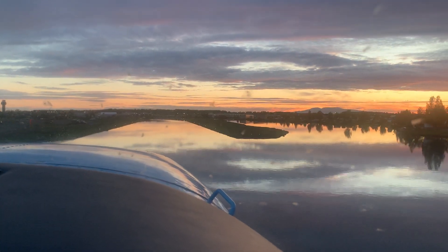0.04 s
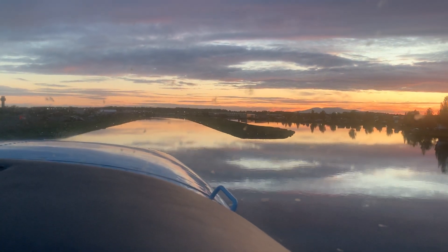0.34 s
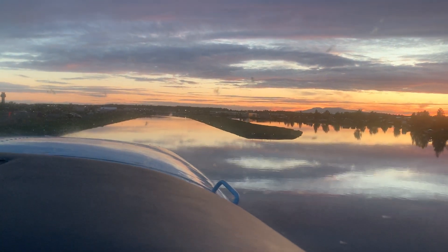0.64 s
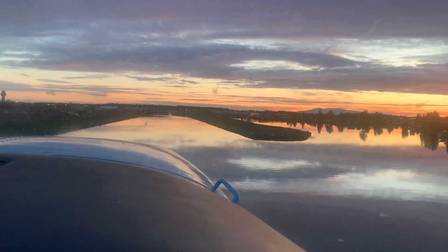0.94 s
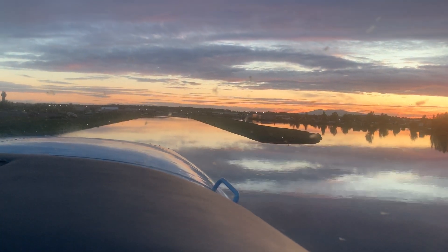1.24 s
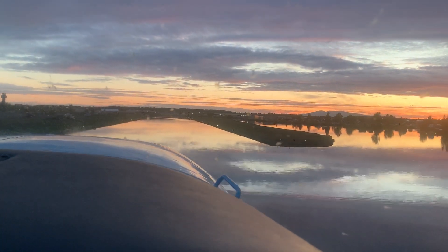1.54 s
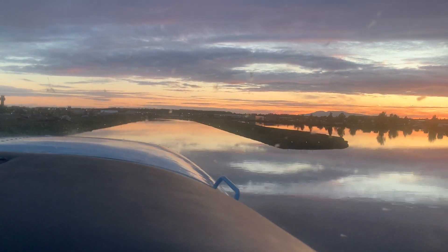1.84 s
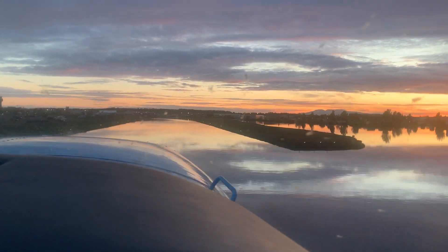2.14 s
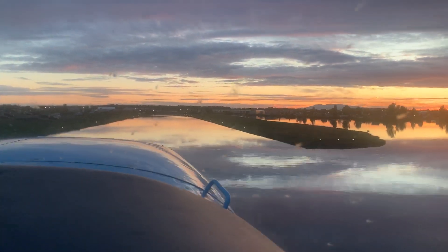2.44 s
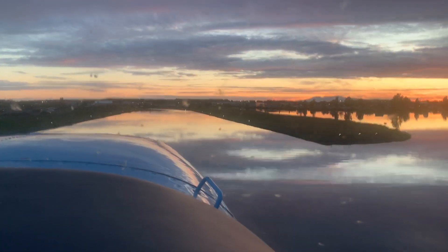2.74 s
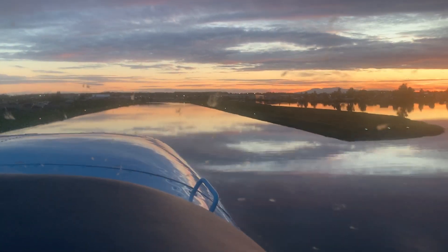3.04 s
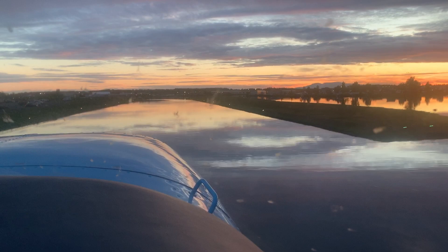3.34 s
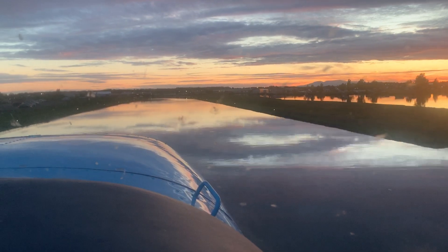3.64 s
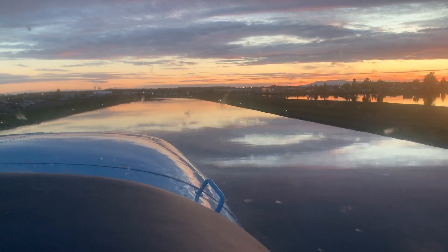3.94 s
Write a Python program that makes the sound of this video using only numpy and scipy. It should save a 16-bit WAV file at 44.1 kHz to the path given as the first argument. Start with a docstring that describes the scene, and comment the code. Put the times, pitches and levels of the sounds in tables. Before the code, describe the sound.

Low drone of a light propeller aircraft from the cockpit, with swelling air rush and hiss.

```python
"""Float plane cabin in low flight

Periodic firing of a six-cylinder engine gives a drone and its octave; unequal cylinders add a comb
of weaker lines and force the panels into resonance. Propeller wash buffets the cabin, turbulent air
rings and hisses at the windscreen, and the whole swells as the plane gathers speed."""
import sys
import numpy as np
from scipy import signal
from scipy.fft import rfft, irfft
from scipy.io import wavfile
from scipy.ndimage import uniform_filter1d

SR = 44100
rng = np.random.default_rng(int(sys.argv[2]) if len(sys.argv) > 2 else 0)


def wrap_up_sound(samples):
    """Save the sound to the file named by the first command line argument, as 16-bit audio."""
    columns = np.atleast_2d(samples).T
    # keep every value between -1 and 1, then stretch to whole-number steps
    tamed = np.clip(columns, -1, 1)
    steps = np.round(tamed * 32767).astype(np.int16)
    wavfile.write(sys.argv[1], SR, steps)


N = 176400
T = np.arange(N) / SR
HZ = np.maximum(np.arange(N // 2 + 1) * SR / N, 1)
CYLINDERS = 6


def undb(db):
    """Amplitude ratio of a level in decibels."""
    return 10 ** (np.asarray(db) / 20)


def unit(x):
    """Normalisation to unit rms."""
    return x / np.sqrt(np.mean(x ** 2))


def curve(rows):
    """Linear interpolation in time."""
    return np.interp(T, *np.array(rows, float).T)


def across(rows, hz=HZ):
    """Interpolation in log frequency."""
    f, v = np.array(rows, float).T
    return np.interp(np.log(hz), np.log(f), v)


def colour(rows):
    """Spectral envelope, with steep roll-off beyond the ends of the table."""
    below, above = np.minimum(HZ / rows[0][0], 1), np.minimum(rows[-1][0] / HZ, 1)
    return undb(across(rows)) * below ** 2 * above ** 4


def resonances(rows):
    """Frequency response as a sum of Lorentzian peaks."""
    return sum(undb(db) / (1 + ((HZ - hz) / width) ** 2) for hz, width, db in rows)


def walk(per_s):
    """Low-pass noise of unit rms, changing about per_s times a second."""
    return unit(irfft(rfft(rng.standard_normal(N)) / (1 + (2 * HZ / per_s) ** 2) ** 2, N))


# Phase lead of the cabin's field, left over right: f/Hz, phase/rad
PHASE_LEAD = [(35, -1), (85, -.2), (117, -.6), (150, -.75), (195, -.45), (234, 0.2), (273, 0.8), (350, 1.8),
              (450, 2.4), (600, 3.3), (900, 2.5), (1200, 2.37), (1430, 4.79), (1800, 3.63), (3190, 6.99),
              (4390, 12.67), (5400, 15.38), (6400, 18.75)]


def harmonic(cycle, order, left_db, right_db):
    """A standing wave at one engine harmonic has a different level and phase on each side."""
    lead = across(PHASE_LEAD, order * cycle[-1] / T[-1])
    phase = 2 * np.pi * (order * cycle + rng.random())
    return np.sqrt(2) * np.array([undb(left_db) * np.sin(phase + lead), undb(right_db) * np.sin(phase)])


# Firing tone and its octave: t/s, level/dB
FIRING_LEVEL = [(0, -22), (.35, -23), (.65, -27.5), (.95, -24.5), (1.1, -21), (1.4, -19), (1.8, -21.5),
                (2.1, -21.5), (2.35, -24), (2.57, -28), (2.75, -27.5), (2.9, -24), (3.15, -17.5),
                (3.3, -17), (3.65, -14), (4, -13)]
OCTAVE_LEVEL = [(0, -32), (.5, -38.5), (.95, -31), (1.25, -38), (1.65, -30.5), (2.05, -32.5), (2.35, -41.5),
                (2.65, -28.5), (3.0, -27), (3.4, -26), (3.65, -34), (3.85, -48), (4, -36)]


def drone(cycle):
    """Periodic firing excites a fundamental and its octave, each swelling and fading independently."""
    fundamental = harmonic(cycle, CYLINDERS, left_db=-15, right_db=0)
    fundamental *= undb(curve(FIRING_LEVEL) - .1 * walk(7.4))
    octave = harmonic(cycle, 2 * CYLINDERS, left_db=1.2, right_db=0)
    octave *= undb(curve(OCTAVE_LEVEL) - .1 * walk(10))
    return fundamental + octave


# Weaker engine lines: order, left level/dB, right level/dB
COMB_LINES = [(4, -56, -43), (5, -56, -42), (7, -44.5, -43), (8, -53.5, -44.5), (9, -50, -46.5),
              (10, -44.5, -43), (11, -53.5, -59.5), (14, -44.5, -46.5), (15, -53.5, -52), (18, -44.5, -44),
              (19, -51, -55), (20, -50, -49.5), (21, -55.5, -56), (24, -59.5, -61), (25, -64, -60),
              (26, -57.5, -70.5), (29, -68, -60.5), (30.2, -53.5, -71), (31, -67, -57.5)]
# Their common gain: t/s, level/dB
COMB_LEVEL = [(0, -4), (1.1, -4.5), (2.2, -0.5), (3, 3), (4, 7)]


def unequal_cylinders(cycle):
    """Unequal firings repeat once a cycle, adding weaker lines at engine orders, most of them between the
    firing harmonics."""
    flutter_db_per_order = .0995
    comb = sum(harmonic(cycle, round(order), left, right) * undb(flutter_db_per_order * order * walk(8))
               for order, left, right in COMB_LINES)
    return comb * undb(curve(COMB_LEVEL))


# Envelope of the clatter's lines: f/Hz, level/dB
CLATTER_SPECTRUM = [(620, -71), (700, -73), (780, -79), (900, -75), (1130, -76), (1250, -83), (1500, -81),
                    (1800, -82)]
# Their common gain: t/s, level/dB
CLATTER_LEVEL = [(0, -3), (1, -3.5), (3, 1.5), (4, 4)]


def clatter(cycle):
    """A rattle repeating every cycle has a line spectrum; random firing strength roughens it."""
    rattle = 0
    for order in range(32, 92):
        gain = undb(across(CLATTER_SPECTRUM, order * cycle[-1] / T[-1]))
        rattle += gain * np.sin(2 * np.pi * (order * cycle + rng.random((2, 1))))
    firing_index = (cycle * CYLINDERS).astype(int)
    strength_db = uniform_filter1d(3.5 * rng.standard_normal(1000)[firing_index], size=150)
    return np.sqrt(2) * rattle * undb(strength_db + curve(CLATTER_LEVEL))


def standing_waves(spread_db=1.7, step_hz=24):
    """Interference leaves narrow peaks and dips in the spectrum on each side."""
    knots = np.arange(0, SR / 2, step_hz)
    ripple = [np.interp(HZ, knots, side) for side in rng.standard_normal((2, len(knots)))]
    return undb(spread_db * np.array(ripple))


# Likeness of the field on left and right: f/Hz, coherence (0-1)
COHERENCE = [(100, 0.69), (400, 1), (500, 0.58), (650, 0.74), (1200, 0.38), (1450, 0.65), (2200, 0.16),
             (4000, 0.14), (5400, 0.6), (6200, .25), (7000, .1)]


def cabin_noise(gain, left_db=0, flicker_db=.88):
    """Coloured, flickering noise in an enclosure is only partly coherent between two points."""
    right, independent = rfft(rng.standard_normal((2, N)))
    coherence = across(COHERENCE)
    left = coherence * right + np.sqrt(1 - np.minimum(coherence, .99) ** 2) * independent
    left *= np.exp(1j * across(PHASE_LEAD)) * undb(left_db)
    pressure = irfft(np.array([left, right]) * gain * standing_waves(), N)
    return unit(pressure) * undb(flicker_db * walk(60))


def ring(modes, waver_hz=12, flare_db=1.3):
    """Randomly driven resonances give narrow-band noise, each wavering in pitch and level."""
    out = 0
    for hz, width, db in modes:
        shift = np.exp(2j * np.pi * np.cumsum(waver_hz * walk(20)) / SR)
        band = cabin_noise(resonances([(hz, width, 0)]))
        tone = np.real(signal.hilbert(band) * shift)
        out += tone * undb(db + flare_db * walk(20))
    return unit(out)


# Panel modes: f/Hz, half-width/Hz, relative level/dB
PANEL_MODES = [(591.5, 27, 2), (840.7, 18, -5), (949, 51, -5.5), (1153.6, 28, -5)]
# Their ringing: t/s, level/dB
PANEL_LEVEL = [(0, -59.5), (.4, -56), (1.2, -53), (2, -52), (3, -50), (3.6, -51.5), (4, -47)]


def panels():
    """Forced vibration: the engine shakes the panels into a coarse ring at their natural frequencies."""
    return ring(PANEL_MODES) * undb(curve(PANEL_LEVEL))


# Trim modes: f/Hz, half-width/Hz, relative level/dB
TRIM_MODES = [(2550, 130, -5), (2820, 51, -0.5), (3108, 60, 2), (3220, 49, -1), (4440, 68, -5)]
# Their buzz: t/s, level/dB
TRIM_LEVEL = [(0, -71.5), (1.5, -67.5), (3, -64), (4, -64)]


def trim_buzz(cycle, depth=.6):
    """Amplitude modulation at the firing rate makes the trim's resonances buzz."""
    pulsing = 1 + depth * np.cos(2 * np.pi * CYLINDERS * cycle)
    return cabin_noise(resonances(TRIM_MODES)) * pulsing * undb(curve(TRIM_LEVEL))


# Buffet spectrum, its left side against the right, and boom spectrum: f/Hz, relative level/dB
BUFFET_SPECTRUM = [(15, -43.5), (25, -27.5), (35, -14.5), (46, -1), (80, -2), (105, -2), (135, -6.5),
                   (170, -10.5), (260, -37.5)]
BUFFET_LEFT = [(40, -4), (65, -4), (90, -8), (115, -10), (150, -8)]
BOOM_SPECTRUM = [(90, -20.5), (140, -8.5), (180, 2), (230, -0.5), (285, -6.5), (330, -12), (380, -5.5),
                 (415, -10.5), (455, -16.5), (560, -25.5), (700, -31.5), (1100, -50.5)]
# Buffet and boom: t/s, level/dB
BUFFET_LEVEL = [(0, -36), (.7, -34.5), (1.9, -32), (2.7, -31.5), (3.1, -29), (3.5, -29), (4, -34)]
BOOM_LEVEL = [(0, -38), (.6, -40), (1.9, -36.5), (2.5, -34.5), (3.05, -31), (3.5, -32.5), (4, -32)]


def propeller_wash():
    """Pressure fluctuations in the wash buffet the cabin and make the enclosed air boom."""
    buffet = cabin_noise(colour(BUFFET_SPECTRUM), across(BUFFET_LEFT)) * undb(curve(BUFFET_LEVEL))
    boom = cabin_noise(colour(BOOM_SPECTRUM)) * undb(curve(BOOM_LEVEL))
    return buffet + boom


def patchy(x, width_hz=75, spread_db=4.8):
    """Independent modulation makes neighbouring midrange bands swell and sink."""
    spectrum = rfft(x)
    for hz in range(500, 1100, width_hz):
        band = irfft(spectrum * np.maximum(1 - abs(HZ - hz) / width_hz, 0), N)
        x = x + band * (undb(spread_db * walk(24)) - 1)
    return x


# Flow noise along the fuselage: f/Hz, relative level/dB
RUSH_SPECTRUM = [(350, -9.5), (560, 6), (690, 4), (780, -3), (1000, -5.5), (1130, -1.5), (1250, -2.5),
                 (1350, 5), (1500, -3.5), (1780, -0.5), (1950, -8), (2600, -23.5), (4000, -43)]
# Its growth: t/s, level/dB
RUSH_LEVEL = [(0, -57), (.7, -58.5), (2, -52.5), (2.9, -50), (3.4, -49), (4, -47.5)]


def fuselage_rush(cycle, depth=.2):
    """Turbulent flow along the fuselage gives broadband noise that throbs with the shaft."""
    throb = unit(sum(np.cos(2 * np.pi * (order * cycle + rng.random())) for order in (1, 2, 4)))
    rush = patchy(cabin_noise(colour(RUSH_SPECTRUM)))
    return rush * (1 + depth * throb) * undb(curve(RUSH_LEVEL))


# Lower and upper whine: f/Hz, half-width/Hz, relative level/dB
LOWER_WHINE = [(1432, 20, 0)]
UPPER_WHINE = [(1588, 32, 0)]
# Their growth: t/s, level/dB
LOWER_WHINE_LEVEL = [(0, -65), (.9, -62), (1.4, -62.5), (1.75, -58), (1.9, -54.5), (2.1, -55.5),
                     (2.55, -54.5), (2.78, -50.5), (3.4, -50.5), (3.7, -52), (4, -49)]
UPPER_WHINE_LEVEL = [(0, -78), (1.5, -69.5), (2.55, -67), (2.85, -54.5), (3.3, -59), (4, -58)]


def windscreen_whine():
    """Flow excites a resonance, likely in a windscreen gap; a higher one joins as speed builds."""
    lower = ring(LOWER_WHINE) * undb(curve(LOWER_WHINE_LEVEL))
    upper = ring(UPPER_WHINE) * undb(curve(UPPER_WHINE_LEVEL))
    return lower + upper


# Hiss spectrum and its left side against the right: f/Hz, relative level/dB
HISS_SPECTRUM = [(1200, -11), (2000, -1.5), (2600, 1), (3100, 0.5), (3900, -1.5), (4700, -5), (5200, -4),
                 (5800, -2.5), (6700, -3.5), (7400, -12), (7900, -13.5), (8500, -17.5), (9300, -28),
                 (10500, -39)]
HISS_LEFT = [(5000, 1), (6800, -2.5), (7600, -7.5), (9000, -6)]
# Thin whistle: f/Hz, half-width/Hz, relative level/dB
WHISTLE_MODE = [(8190, 210, 0)]
# Hiss and whistle: t/s, level/dB
HISS_LEVEL = [(0, -61.5), (.7, -61), (1.5, -59.5), (2.2, -57), (2.9, -55), (3.4, -53.5), (4, -52.5)]
WHISTLE_LEVEL = [(0, -81), (2.2, -75.5), (2.8, -88), (4, -77)]


def seal_leaks():
    """Air leaking past the seals gives broadband hiss and, to the right, a narrow-band whistle."""
    hiss = cabin_noise(colour(HISS_SPECTRUM), across(HISS_LEFT)) * undb(curve(HISS_LEVEL))
    whistle = cabin_noise(resonances(WHISTLE_MODE), left_db=-10) * undb(curve(WHISTLE_LEVEL))
    return hiss + whistle


# Two faint, thin tones near 11 kHz: f/Hz, half-width/Hz, relative level/dB
FAINT_HIGH_TONES = [(10908, 5, 0), (11142, 5, -2)]


def faint_high_tones():
    """Very narrow noise bands are heard as thin tones, mostly on the right, rising with the hiss."""
    return cabin_noise(resonances(FAINT_HIGH_TONES), left_db=-11.5) * undb(curve(HISS_LEVEL) - 30)


# Firing rate of the engine: t/s, f/Hz
FIRING_RATE = [(0, 114.3), (.35, 115.3), (.8, 115.8), (1.2, 116.9), (2.0, 117.1), (2.7, 116.5),
               (3.1, 116.9), (3.5, 116.9), (4, 117.8)]


def scene():
    """Superposition of engine and airflow at the front seat."""
    jitter = .0015 * walk(15)
    cycle = np.cumsum(curve(FIRING_RATE)) / SR / CYLINDERS + jitter  # engine cycles elapsed
    engine = drone(cycle) + unequal_cylinders(cycle) + clatter(cycle)
    cabin = panels() + trim_buzz(cycle)
    airflow = propeller_wash() + fuselage_rush(cycle) + windscreen_whine() + seal_leaks()
    return engine + cabin + airflow + faint_high_tones()


def record(dry):
    """An elliptic low-pass filter removes the highest treble."""
    cutoff_hz = 11500
    return signal.sosfilt(signal.ellip(8, .2, 70, cutoff_hz, fs=SR, output="sos"), dry)


dry = scene()
out = record(dry)
wrap_up_sound(out)
```